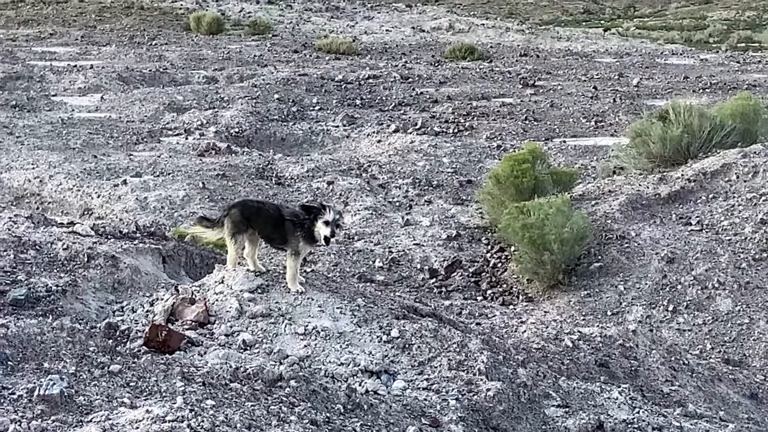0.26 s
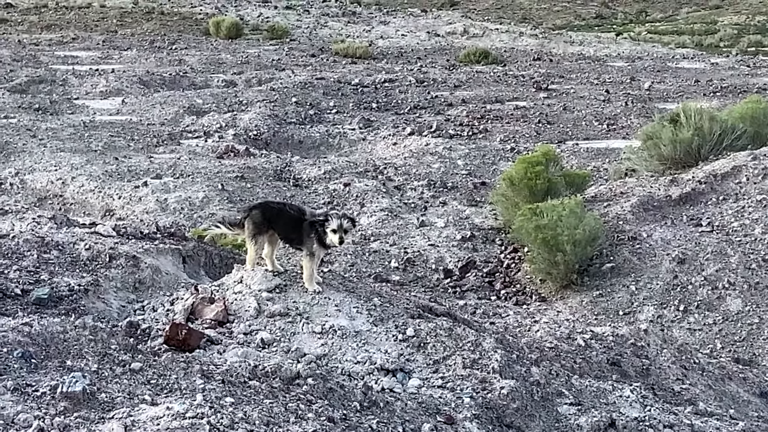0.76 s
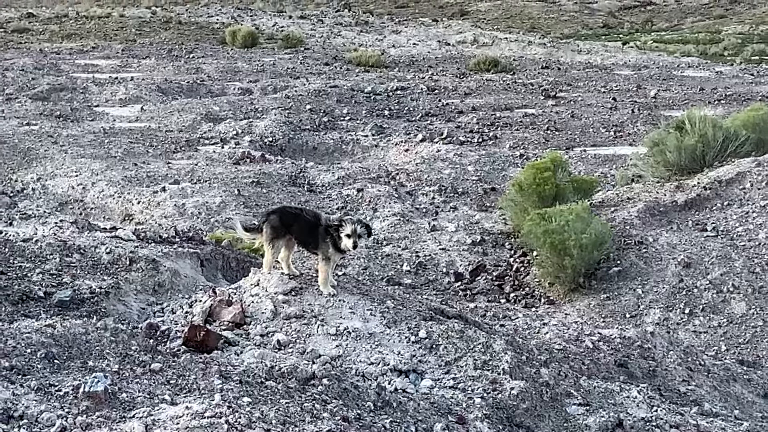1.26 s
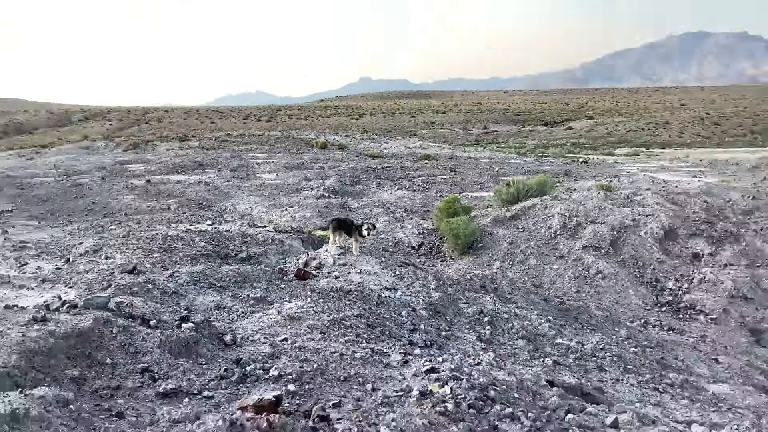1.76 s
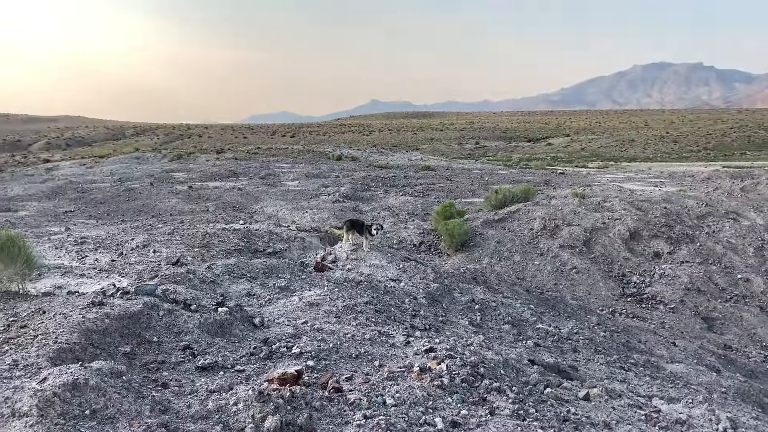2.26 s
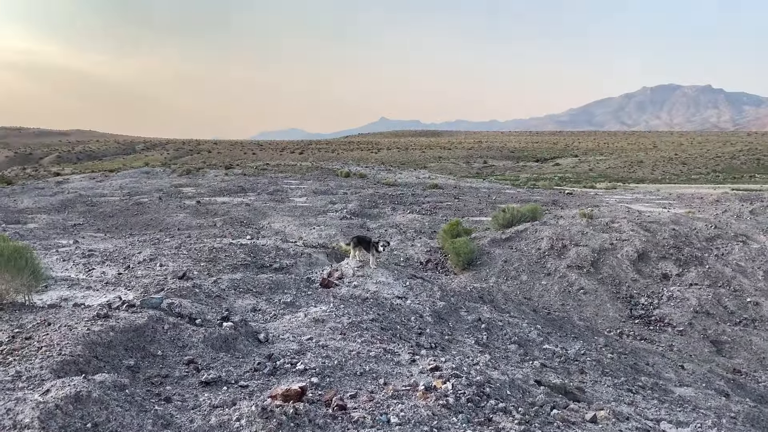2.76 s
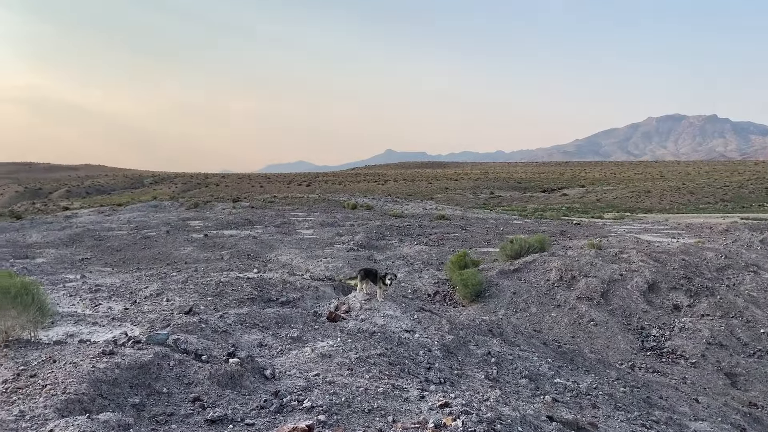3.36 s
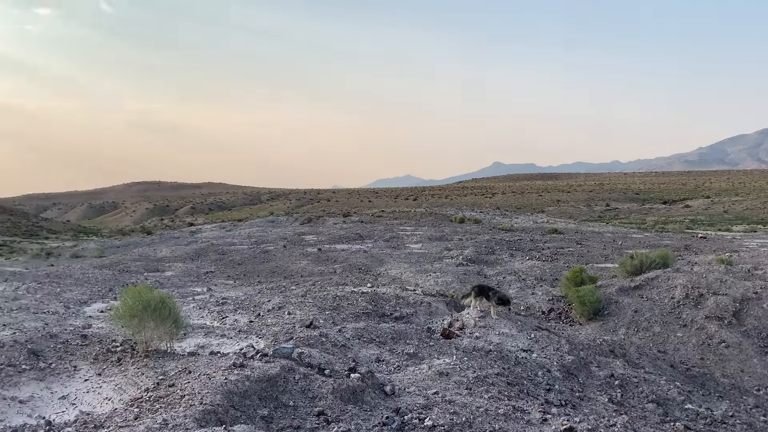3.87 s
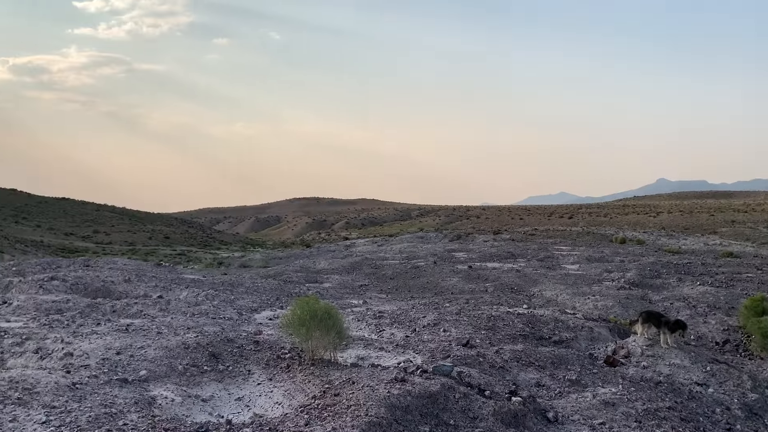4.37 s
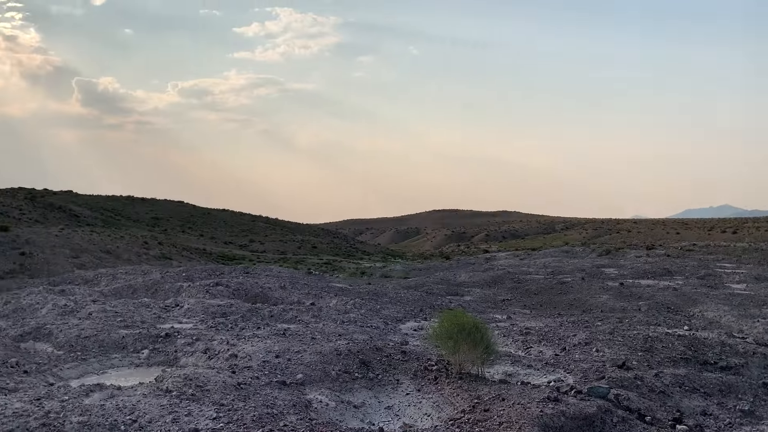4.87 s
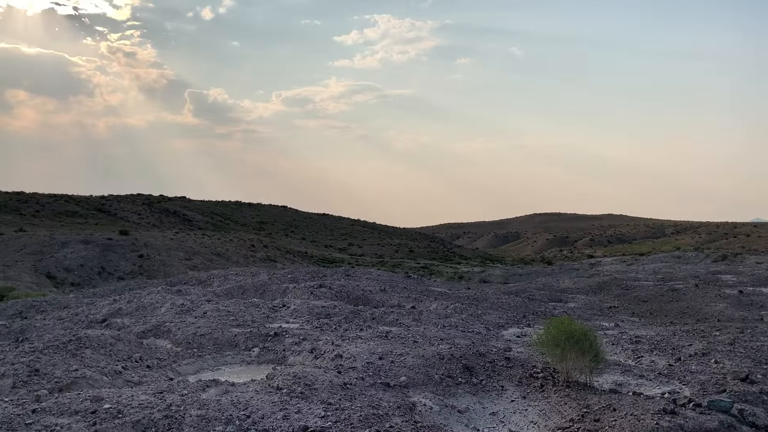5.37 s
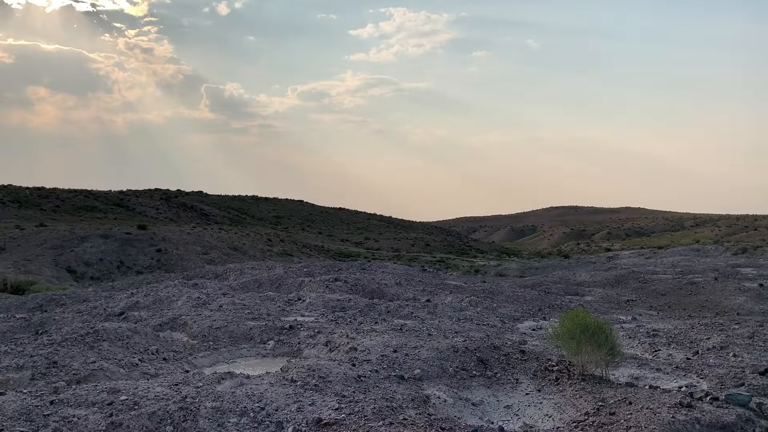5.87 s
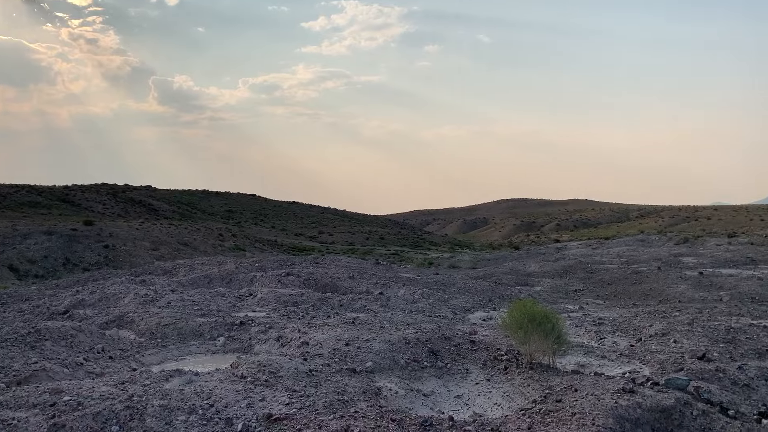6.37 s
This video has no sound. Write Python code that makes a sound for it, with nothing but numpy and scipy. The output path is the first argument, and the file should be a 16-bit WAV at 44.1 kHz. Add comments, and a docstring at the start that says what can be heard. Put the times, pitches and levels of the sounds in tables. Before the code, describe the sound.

Outdoors on a bare gravel hill, wind strikes a hand-held stereo microphone. Low rumble opens quietly, then swells to thudding, roaring buffets around one and a half seconds. Short gritty shoe scuffs and sharp stone clicks follow before three seconds. The wind eases to near calm around five, then returns with strong overloaded thumps near six.

```python
"""On a bare gravel hill, gusty wind buffets the two microphone ports of a hand-held camera.
Frozen turbulence swept past the ports makes rumble, roar and buffets: the faster it passes, the higher it sounds.
Air at the port edges hisses and a port cavity whistles; the camera sums its bass to mono.
A shoe scuffs the gravel as bursts of dense grains, which also make three puffs of wind hiss at the left port.
A few stones click as short rings with noisy cracks, over the steady noise of the microphones themselves."""
import sys
import numpy as np
from scipy import signal
from scipy.fft import rfft, irfft
from scipy.io import wavfile
from scipy.ndimage import uniform_filter1d, map_coordinates

SR = 44100
rng = np.random.default_rng(int(sys.argv[2]) if len(sys.argv) > 2 else 0)


def wav_record(signal):
    """Record a signal, one row per channel, as 16-bit PCM in the file named by sys.argv[1]."""
    frames = np.transpose(np.atleast_2d(signal))
    bounded = np.clip(frames, -1, 1)
    # unit amplitude maps onto the largest positive 16-bit level
    quanta = np.round(bounded * 32767).astype(np.int16)
    wavfile.write(sys.argv[1], SR, quanta)


N = 292383


def gain_of(db):
    """Level: decibels to an amplitude factor."""
    return 10 ** (np.asarray(db) / 20)


def evened(x):
    """Normalization: scales x to rms 1."""
    return x / np.sqrt(np.mean(x ** 2) + 1e-20)


def band(x, lo_hz, hi_hz, order=2):
    """Band limitation: Butterworth band-pass."""
    return signal.sosfilt(signal.butter(order, [lo_hz, hi_hz], "band", fs=SR, output="sos"), x)


def low_cut(x, cut_hz, order):
    """High-pass filtering: Butterworth attenuation below the cutoff."""
    return signal.lfilter(*signal.butter(order, cut_hz, "high", fs=SR), x)


def coloured(x, points):
    """Spectral shaping: filters x by a (frequency [Hz], gain [dB]) table, interpolated over log frequency."""
    hz, db = np.transpose(points)
    f = np.fft.rfftfreq(x.shape[-1], 1 / SR)
    gain = gain_of(np.interp(np.log(f + 1), np.log(hz), db))
    return irfft(rfft(x) * gain, x.shape[-1])


def steadied(x, lo_hz, hi_hz, size):
    """Level equalization: divides x by its slow rms in one band."""
    power = uniform_filter1d(band(x, lo_hz, hi_hz) ** 2, size)
    return x / np.sqrt(abs(uniform_filter1d(power, size)) + 1e-9)


def wobble(fastest_hz):
    """Random modulation: smooth narrow-band noise of rms 1."""
    return evened(band(rng.standard_normal(N), fastest_hz / 4, fastest_hz, order=4))


def add(mix, s, sound):
    """Superposition: mixes a sound in, starting at time s."""
    part = mix[..., round(s * SR):][..., :sound.shape[-1]]
    part += sound[..., :part.shape[-1]]


# Spectrum of the microphones' own noise: (frequency [Hz], relative density [dB per Hz])
HISS_SPECTRUM = [(200, 10), (600, 19), (1400, 23), (3000, 16), (6200, 14), (9000, 9.6), (11000, 17),
                 (13000, 6.8), (15000, 7.7)]
HISS_DB = -77.5  # rms in each channel


def hiss():
    """Self-noise: each microphone has its own independent coloured noise."""
    return gain_of(HISS_DB) * evened(coloured(rng.standard_normal((2, N)), HISS_SPECTRUM))


# Stones knocking together:
# (time [s], ring level before panning [dB], ring frequency [Hz], crack level relative to the ring [dB])
STONE_KNOCKS = [(0.301, -53, 1730, -25), (0.316, -64, 1810, -25), (1.87, -59, 2150, -11),
                (2.3502, -33.5, 2330, -13), (2.67, -43.5, 2730, -15), (2.7901, -48, 2920, -5),
                (2.82, -43.5, 1890, -5.5), (2.837, -44, 2540, -4.5), (2.8424, -33, 1880, 2.5),
                (2.8429, -43.5, 3400, -0.5)]
# Spectrum of stone cracks and of grains: (frequency [Hz], relative density [dB per Hz])
GRAIN_SPECTRUM = [(700, 7), (1500, -6), (2100, -2.5), (2900, -9), (3500, -7.5), (4200, -6.5), (4900, -6.5),
                  (5400, -16.5), (6300, -9.5), (7400, -14.5), (8400, -17.5), (9300, -21), (15000, -31.5)]
CRACK_T60_S, RING_T60_S = 0.048, 0.0057  # times to decay by 60 dB


def stones():
    """Impact excitation: a damped sinusoidal ring and a decaying crack of noise, a little to the right."""
    out, t = np.zeros((2, N)), np.arange(2000) / SR
    pan_db = np.array([[-1.5], [1.5]])
    noises = rng.standard_normal((len(STONE_KNOCKS), 2, 2000))
    for (s, ring_db, hz, crack_db), noise in zip(STONE_KNOCKS, noises):
        onset = np.minimum(t / 0.00025, 1)
        ring = np.sin(2 * np.pi * hz * t) * gain_of(-60 * t / RING_T60_S) * onset
        crack = evened(coloured(noise, GRAIN_SPECTRUM)) * gain_of(crack_db - 60 * t / CRACK_T60_S)
        add(out, s, gain_of(ring_db + pan_db) * (ring + crack))
    return out


# A shoe dragging over grit; the last three rows are puffs of wind hiss at the left port, made with the
# same grains:
# (start [s], swell time [s], hold time [s], level before a common 2 dB lift [dB],
#  loudest colour [Hz], emphasis of that colour before normalization [dB], left minus right [dB])
SCUFFS_AND_PUFFS = [(1.423, 0.048, 0.057, -60.5, 4900, 1, 1), (1.654, 0.016, 0.13, -73.5, 3590, 11, -1),
                    (2.302, 0.044, 0.0064, -64, 2400, 12, -3),
                    (2.421, 0.017, 0.085, -61.5, 4030, 3.5, -3.5),
                    (2.529, 0.031, 0.038, -58, 2910, 0, -5.5), (2.629, 0.036, 0.011, -68.5, 2680, 16, -9),
                    (2.705, 0.077, 0.015, -60.5, 2860, 5, -0.5),
                    (2.794, 0.04, 0.0079, -52.5, 6900, -2, -3.5),
                    (3.079, 0.018, 0.043, -73.5, 5300, 3, 6.5), (3.229, 0.062, 0.025, -73, 5460, 12, 8),
                    (5.829, .02, 0.025, -68.5, 4470, 5.5, 9)]
SWELL_DB, FALL_DB_PER_S = 24, 402.5  # rises through this range; dies away at this rate after the hold
COLOUR_OCTAVES = .15  # distance from the loudest colour at which its emphasis falls to 1/e
GRAINS_PER_S = 9000  # in each of two independent streams


def scuffs_and_puffs():
    """Granular synthesis: a dense random train of impulses of many sizes, each burst with its own colour."""
    out, t = np.zeros((2, N)), np.arange(16384) / SR
    hz = np.geomspace(500, 15000, 60)
    for s, swell, hold, db, loudest_hz, emphasis_db, pan_db in SCUFFS_AND_PUFFS:
        chance, sign, heavy = rng.random(size=(3, 2, len(t)))
        weight = gain_of(-2.5 * np.log(heavy + .02))
        impulses = weight * (chance < GRAINS_PER_S / SR) * np.sign(sign - .5)
        shared = impulses + 0.4 * impulses[::-1]  # each side also hears the other's grains
        octaves = np.log2(hz / loudest_hz)
        emphasis = np.transpose([hz, emphasis_db * np.exp(-(octaves / COLOUR_OCTAVES) ** 2)])
        grains = evened(coloured(coloured(shared, GRAIN_SPECTRUM), emphasis))
        swell_db = SWELL_DB * np.minimum(t / swell - 1, 0)
        fall_db = FALL_DB_PER_S * np.maximum(t - swell - hold, 0)
        level = gain_of(db + swell_db - fall_db) * np.minimum(t / 0.007, 1)
        sides = gain_of(2.0 + pan_db * np.array([[.5], [-.5]]))
        add(out, s, sides * level * grains)
    return out


EDDY_HZ = 300  # at unit speed, viscosity takes 40 dB here


def eddies(slope_db):
    """Frozen turbulence: a random pattern whose smallest whirls are smoothed away by viscosity."""
    size = 2 ** 19
    hz = np.fft.rfftfreq(size, 1 / SR)
    db = -slope_db * np.log2(1 + hz / 20.) - 40 * (hz / EDDY_HZ) ** 1.063
    return evened(irfft(rfft(rng.standard_normal(size)) * gain_of(db), size))


def swept(pattern, speed, start):
    """Convection: the frozen pattern passes a port at a changing speed, which scales its frequencies."""
    place = start * len(pattern) + np.cumsum(speed)
    return map_coordinates(pattern, [place], order=3, mode="grid-wrap", prefilter=False)


# The steady stream: (time [s], rumble [dB], roar [dB]), before the common offsets and surges in stream().
# Rumble is referred to 30-120 Hz and roar to 150-400 Hz.
STREAM_LEVELS = [(0.0, -28, -43), (0.42, -20, -44), (0.55, -27.5, -46), (0.899, -20, -39),
                 (1.109, -19.5, -32), (1.361, -13, -28.5), (1.46, -11.5, -31.5), (1.697, -28, -43),
                 (2.01, -21.5, -41.5), (2.301, -23.5, -41), (2.45, -31.5, -50), (2.551, -19, -42),
                 (2.577, -1, -36.5), (2.605, -24, -38), (2.79, -22, -35.5), (2.878, -24, -41),
                 (2.948, -17, -36.5), (3.2, -23, -30.5), (3.379, -21.5, -38), (3.559, -25, -44),
                 (3.861, -17, -39.5), (4.0, -25.5, -52), (4.38, -25.5, -41), (4.599, -20.5, -45),
                 (4.649, -33, -51.5), (4.951, -42, -65.5), (5.06, -21.5, -61), (5.119, -39.5, -63.5),
                 (5.298, -29.5, -54), (5.539, -18.5, -37), (5.7, -27, -42), (5.791, -33.5, -50),
                 (5.851, -10.5, -37.5), (6.04, -19.5, -29), (6.304, -20, -32.5), (6.63, -22.5, -37)]


def curve(axis):
    """Slow level variation: one column of the stream table as a smooth line, sample by sample."""
    rows = np.transpose(STREAM_LEVELS)
    return uniform_filter1d(np.interp(np.arange(N) / SR, rows[0], rows[axis]), size=600)


# Strong eddies:
# (peak time [s], peak level before a common 3.5 dB lift [dB], treble relative to the peak, setting speed [dB])
STRONG_EDDIES = [(0.057, -38.5, -41.5), (0.094, -31, -40), (0.224, -35.5, -45.5), (0.452, -33.5, -41),
                 (0.627, -37, -37.5), (0.665, -30, -37.5), (0.79, -45, -30), (0.82, -32, -33),
                 (0.876, -37.5, -34.5), (0.915, -25, -21.5), (0.946, -25.5, -31.5), (0.978, -25.5, -26),
                 (1.001, -10, -22.5), (1.01, -24, -21.5), (1.125, -29, -23), (1.191, -30, -18.5),
                 (1.216, -25.5, -18), (1.257, -32, -21), (1.281, -28, -23.5), (1.296, -28.5, -18.5),
                 (1.308, -27.5, -10.5), (1.315, -35, -18), (1.372, -25, -30.5), (1.393, -22, -28.5),
                 (1.407, -26.5, -27), (1.421, -22, -19.5), (1.436, -27.5, -18), (1.446, -13, -10.5),
                 (1.473, -16.5, -16), (1.49, -14.5, -14), (1.502, -27.5, -13), (1.513, -27.5, -21),
                 (1.539, -22.5, -30.5), (1.604, -38.5, -30.5), (1.642, -43, -32), (1.874, -37.5, -24),
                 (1.887, -33.5, -26), (1.903, -33.5, -33.5), (1.943, -34, -33.5), (2.056, -35, -37),
                 (2.163, -32.5, -32.5), (2.199, -36.5, -27), (2.217, -27, -12), (2.228, -25.5, -16.5),
                 (2.293, -28, -15.5), (2.325, -29, -11), (2.558, -22, -23), (2.619, -17.5, -25.5),
                 (2.639, -32.5, -22.5), (2.674, -40, -15), (2.684, -23.5, -26), (2.703, -27, -21),
                 (2.717, -25, -21), (2.731, -28.5, -20), (2.752, -26, -16), (2.763, -33.5, -21.5),
                 (2.784, -29, -19.5), (2.959, -33.5, -20.5), (2.974, -18, -28), (3.037, -38.5, -21.5),
                 (3.064, -32.5, -19.5), (3.097, -28.5, -13), (3.121, -25, -17.5), (3.16, -38, -29),
                 (3.18, -26.5, -25.5), (3.195, -27, -34), (3.219, -31.5, -29.5), (3.234, -27, -38.5),
                 (3.258, -34.5, -18.5), (3.275, -29.5, -31.5), (3.319, -32.5, -31.5), (3.34, -24.5, -29.5),
                 (3.37, -23.5, -23), (3.394, -31, -24), (3.428, -46, -26), (3.608, -25, -30),
                 (3.74, -29, -32.5), (3.822, -25, -22.5), (3.866, -29, -24), (4.077, -55, -30),
                 (4.141, -38.5, -30.5), (4.169, -48, -28.5), (4.206, -38, -25), (4.246, -29.5, -27),
                 (4.295, -38, -20.5), (4.388, -39, -17), (4.415, -47, -22), (4.429, -35.5, -19),
                 (4.452, -34, -23.5), (4.473, -31.5, -25), (4.572, -36, -24.5), (4.59, -38.5, -29.5),
                 (4.626, -46, -31.5), (4.747, -38.5, -36), (4.774, -49, -39), (5.053, -47.5, -43.5),
                 (5.271, -24, -14), (5.283, -30.5, -20), (5.347, -33, -36.5), (5.372, -32, -40.5),
                 (5.439, -24, -22), (5.451, -27.5, -34.5), (5.464, -32.5, -12), (5.518, -22.5, -30),
                 (5.532, -24.5, -17), (5.55, -15.5, -14), (5.567, -22.5, -22), (5.596, -24.5, -26),
                 (5.617, -28.5, -36), (5.635, -32, -36), (5.715, -37.5, -40), (5.843, -12.5, -22.5),
                 (5.873, -28, -28), (5.882, -21.5, -12.5), (5.905, -28.5, -13.5), (5.93, -15.5, -45.5),
                 (5.955, -25, -12.5), (6.037, -32, -25.5), (6.055, -34, -28.5), (6.078, -22, -24.5),
                 (6.089, -13, -6), (6.105, -7, -10), (6.116, -30.5, -11), (6.128, -32.5, -12.5),
                 (6.138, -15.5, -17.5), (6.152, -20, -16.5), (6.183, -20, -34), (6.228, -27.5, -28),
                 (6.241, -13.5, -14), (6.319, -34.5, -41.5), (6.357, -48.5, -41.5), (6.387, -29, -38),
                 (6.466, -35.5, -45.5), (6.545, -28.5, -33), (6.578, -25.5, -41), (6.617, -34.5, -27.5)]
HEAVE_DB, HEAVE_S = -16.5, 0.028  # relative to the eddy's table level; time to the crest


def heave():
    """Entrainment: each strong eddy drags a larger whirl behind it, whose rumble swells and dies."""
    s, peak_db, _ = np.transpose(STRONG_EDDIES)
    kicks, t = np.zeros(N), np.arange(9000) / SR / HEAVE_S
    kicks[(s * SR).astype(int)] = gain_of(HEAVE_DB + peak_db)
    return signal.oaconvolve(kicks, t * np.exp(1 - t))[:N]


SURGE_DB = 3.5  # rms by which rumble and roar surge together


def stream(pattern):
    """Convected turbulence: large whirls drift slowly; small ones flutter and pass faster the louder they roar."""
    rumble = steadied(swept(pattern, np.full(N, .9), .5), 30, 120, size=4000)
    roar_db, flutter = curve(axis=2), wobble(fastest_hz=30.)
    pace = gain_of(.2 * (roar_db + 35) + 1.6 * flutter)
    speed = 1 + 4 * np.tanh(pace / 3)  # bounded below 5
    roar = coloured(swept(pattern, speed, 0), [(30, -5.5), (90, 0.5), (200, -12.5)])
    roar = steadied(roar, 150, 400, size=2500)
    surge_db = SURGE_DB * wobble(fastest_hz=13.78)
    rumble_gain = gain_of(curve(axis=1) - 2.0 + surge_db) + heave()
    roar_gain = gain_of(roar_db - 6.0 + 3.8 * flutter + surge_db)
    return rumble_gain * rumble + roar_gain * roar


def eddy_speed(treble_db):
    """Frequency scaling by convection: the brighter an eddy, the faster it passes."""
    return 72. / np.clip(-treble_db + 1.5, 9, 55)


# Air stirred around each strong eddy: level relative to its table level, rise and fall times, share of speed
CHURN_DB, CHURN_RISE_S, CHURN_FALL_S, CHURN_PACE = -12, 0.0083, .017, .42


def churn(pattern):
    """Turbulent breakdown: air speeds up towards each strong eddy and crumbles away after it."""
    s, peak_db, treble_db = np.transpose(STRONG_EDDIES)
    t = np.arange(-4000, 4001) / SR
    tent = np.exp(np.where(t < 0, t / CHURN_RISE_S, -t / CHURN_FALL_S))
    size, haste = np.zeros((2, N))
    size[(s * SR).astype(int)] = gain_of(CHURN_DB + peak_db)
    haste[(s * SR).astype(int)] = eddy_speed(treble_db)
    size, haste = (abs(signal.oaconvolve(x, tent, "same")) for x in (size, haste))
    flutter = wobble(fastest_hz=70.)
    speed = (1.2 + CHURN_PACE * 6 * np.tanh(haste / 6)) * gain_of(1.5 * flutter)
    air = low_cut(swept(pattern, speed, .25), 220., order=2)
    return size * gain_of(3.0 * flutter) * steadied(air, 200, 1400, size=1500)


SMALL_PER_S = 26  # nominal rate of the lesser eddies outside the wakes
SMALL_DB, SMALL_SPREAD_DB = -7.5, 16  # highest peak relative to the roar, before its effect; spread below it
SMALL_TREBLE_DB = -33.5  # mean treble relative to the peak, before the effect of the roar
SMALL_LAW = 0.46  # extra dB of level and of treble per dB of roar
WAKE_FIRST_S, WAKE_LAST_S = .008, .035  # delay range of the eddy trailing each strong one
WAKE_DB, WAKE_DB_PER_S, WAKE_TREBLE_DB = -10.5, -100, -4  # level, its change with delay, and duller treble
SLOWING_S, SMALL_SLOWING_S = .0055, .004  # time scales on which strong and lesser eddies lose speed


def lesser():
    """Eddy cascade: rows for small eddies, one in each slot of time and one in each strong eddy's wake."""
    count = int(N / SR * SMALL_PER_S)
    when, size, colour = rng.random((count, 3)).T
    s = .05 + (np.arange(count) + when) / SMALL_PER_S * .98
    roar_db = curve(axis=2)[(s * SR).astype(int)]
    effort_db = SMALL_LAW * (roar_db + 38.5)
    peak_db = roar_db + effort_db + SMALL_DB - SMALL_SPREAD_DB * size
    treble_db = SMALL_TREBLE_DB + effort_db + 12 * (colour - .5)
    stray = np.transpose([s, peak_db, treble_db])
    late = WAKE_FIRST_S + (WAKE_LAST_S - WAKE_FIRST_S) * rng.random(len(STRONG_EDDIES))
    change = [late, WAKE_DB + WAKE_DB_PER_S * late, np.full(len(late), WAKE_TREBLE_DB)]
    wake = np.array(STRONG_EDDIES) + np.transpose(change)
    return [(*row, SMALL_SLOWING_S) for row in [*stray, *wake]]


def buffets(pattern):
    """Transient convection: each fast eddy speeds up quickly to its peak and then slows down, so its pitch
    rises and then falls."""
    lead = .04  # s before the peak
    out, t = np.zeros(N), np.arange(7000) / SR - lead
    edges = signal.windows.tukey(len(t), .3)
    rows = [*lesser(), *[(*row, SLOWING_S) for row in STRONG_EDDIES]]
    for (s, peak_db, treble_db, slowing), start in zip(rows, rng.random(len(rows))):
        age = t / np.where(t < 0, .0016 + .25 * slowing, slowing)
        speed = eddy_speed(treble_db) * (.4 + 0.6103 / (1 + 0.5 * abs(age) ** 2.205))
        eddy = low_cut(swept(pattern, speed, start), 130., order=1)
        eddy = eddy * edges * np.exp(-(age / np.where(t < 0, 1.7, 2.6)) ** 2)
        # a dull eddy is scaled by its thump
        size = max(abs(band(eddy, 392.3, 1900)).max(), 0.4 * abs(eddy).max())
        add(out, s - lead, gain_of(peak_db + 3.5) * eddy / size)
    return out


# Spectrum of the fine hiss of air at the ports: (frequency [Hz], relative density [dB per Hz])
RUSH_SPECTRUM = [(300, -26.5), (800, -5), (1300, -2.5), (1600, -21), (2200, -23.5), (4000, -33.5),
                 (7500, -39.5), (10000, -39.5), (15000, -40)]
PORT_HZ = 11000  # resonance of the cavity before the membrane


def wind():
    """Flow noise: turbulence with more treble at the windward left port, plus edge hiss and cavity resonance."""
    pattern = eddies(slope_db=-0.5)
    mid = buffets(pattern) + churn(pattern) + stream(pattern)
    side = coloured(mid, [(300, -35.0), (700, -15.5), (1100, -8.0), (2500, -3.5)])
    press = np.sqrt(abs(uniform_filter1d(band(mid, 150, 1000) ** 2, size=600)))
    lasting = uniform_filter1d(press, size=3000) ** 1.19
    whistle = evened(band(rng.standard_normal(N), PORT_HZ - 300, PORT_HZ + 300))
    rush = evened(coloured(rng.standard_normal((2, N)), RUSH_SPECTRUM))
    ports = np.array([mid + side, mid - side])
    return ports + gain_of(-60.5) * press * whistle + gain_of(-39.5) * lasting * rush


def scene():
    """Linear superposition: all sources add at the two ports."""
    return wind() + scuffs_and_puffs() + stones() + hiss()


EDGE_HZ = 15700  # upper band limit of the camera


def record(dry):
    """Transduction: bass cut against rumble, soft overload, bass summed to mono, band limit."""
    cut = signal.sosfilt(signal.butter(4, 50., "high", fs=SR, output="sos"), dry)
    left, right = cut / (1 + abs(cut) ** 4) ** .25  # peaks bend just under full scale
    side = coloured((left - right) / 2, [(450, -100), (620, -28.5), (950, 0.5)])
    pair = (left + right) / 2 + np.array([side, -side])
    low_pass = signal.firwin(511, EDGE_HZ, window=("kaiser", 9), fs=SR)
    return signal.oaconvolve(pair, low_pass[None], "same")


dry = scene()
out = record(dry)
wav_record(out)
```